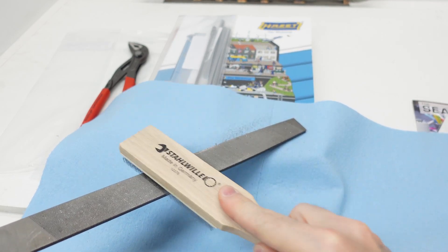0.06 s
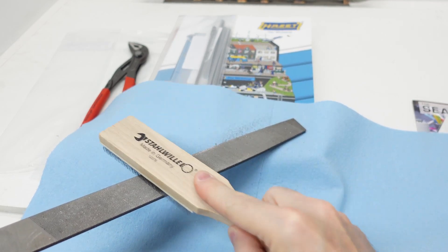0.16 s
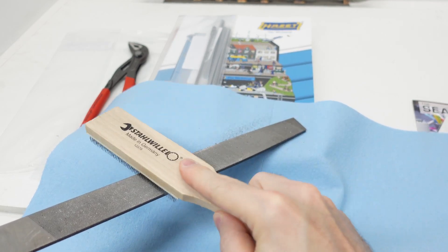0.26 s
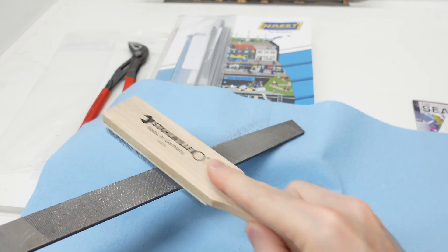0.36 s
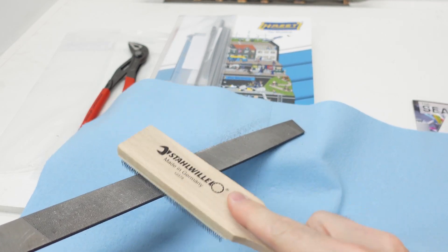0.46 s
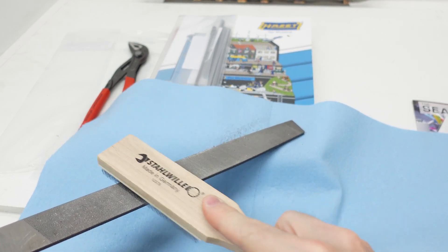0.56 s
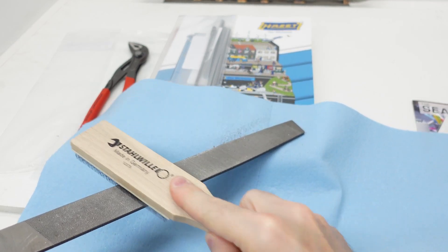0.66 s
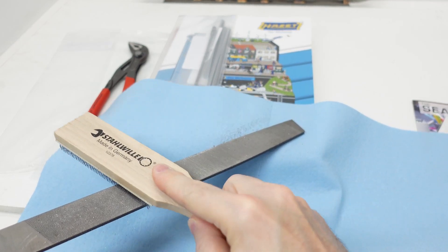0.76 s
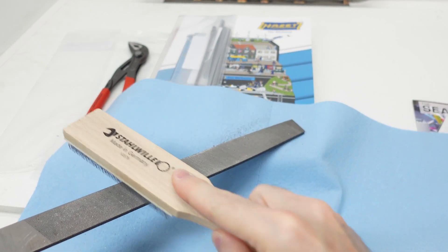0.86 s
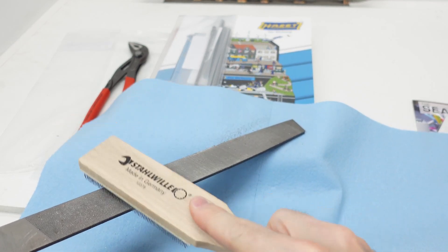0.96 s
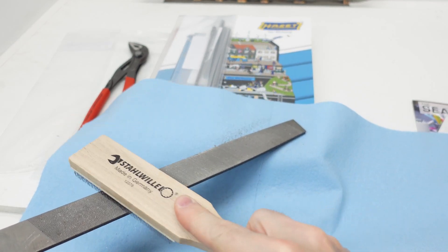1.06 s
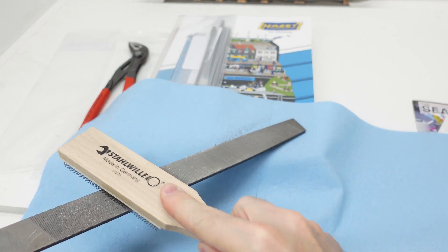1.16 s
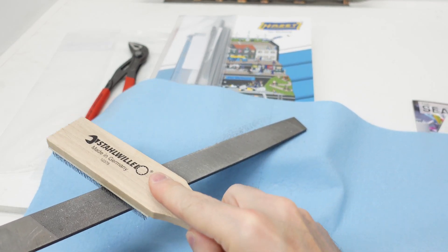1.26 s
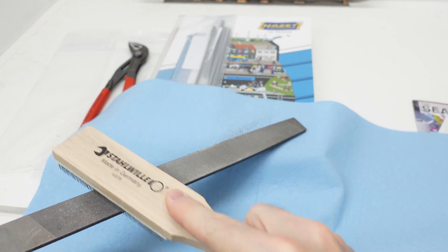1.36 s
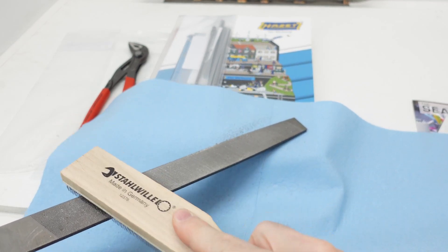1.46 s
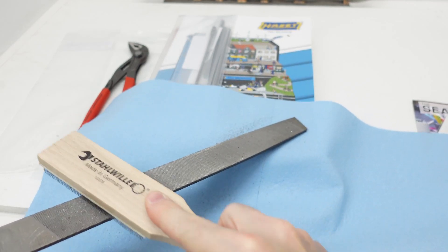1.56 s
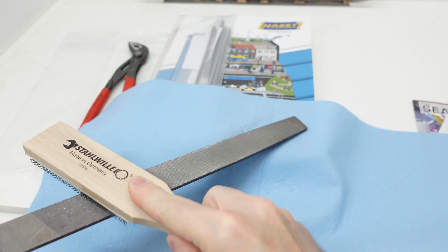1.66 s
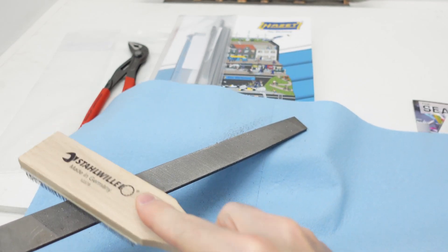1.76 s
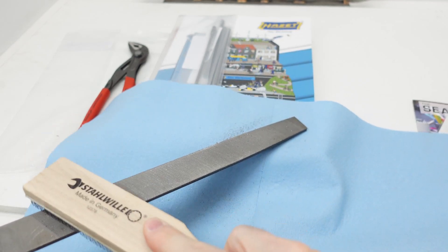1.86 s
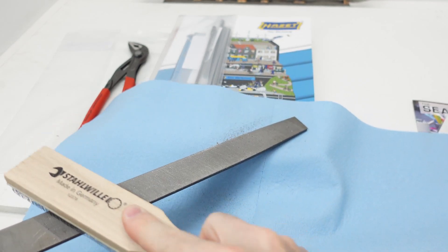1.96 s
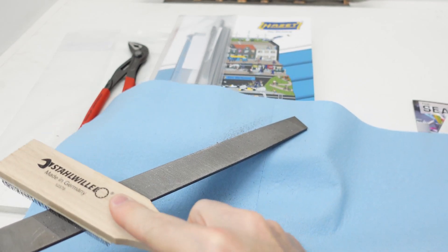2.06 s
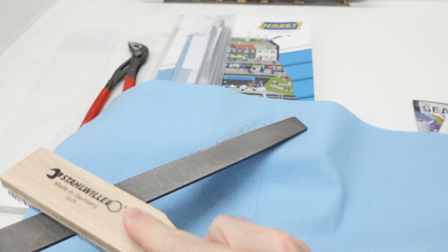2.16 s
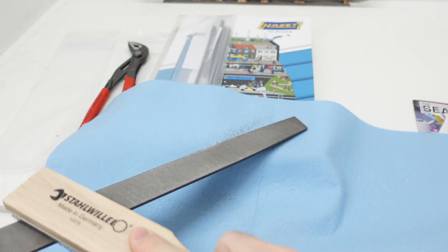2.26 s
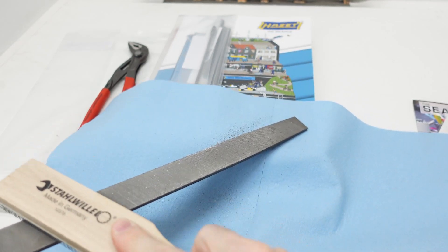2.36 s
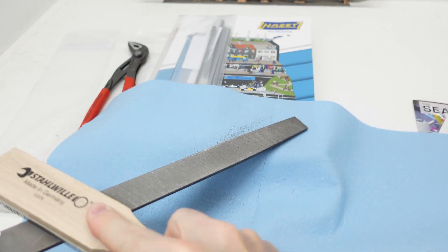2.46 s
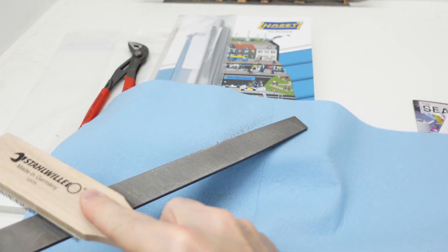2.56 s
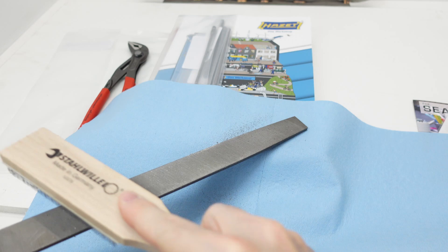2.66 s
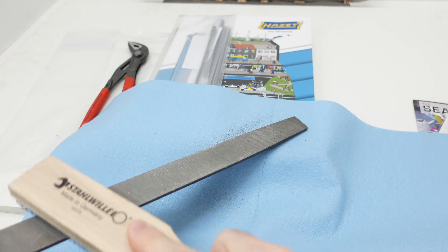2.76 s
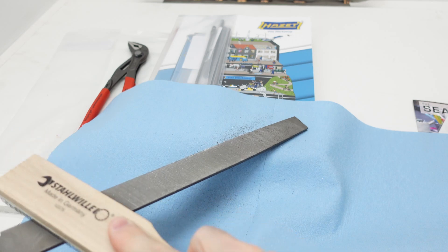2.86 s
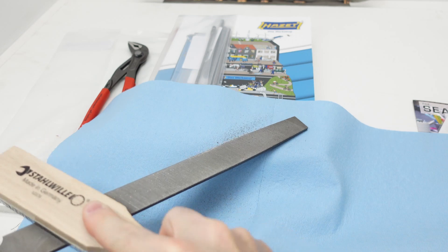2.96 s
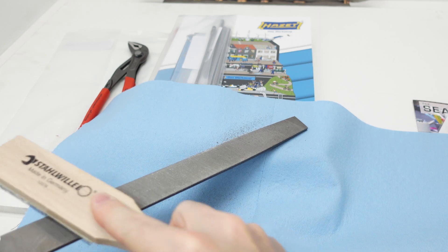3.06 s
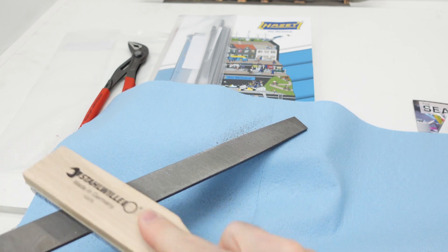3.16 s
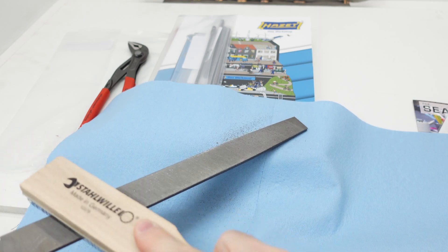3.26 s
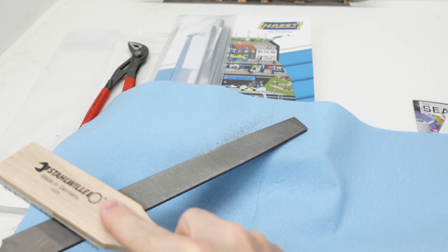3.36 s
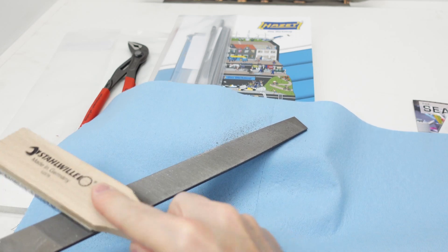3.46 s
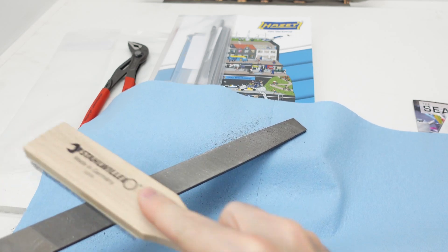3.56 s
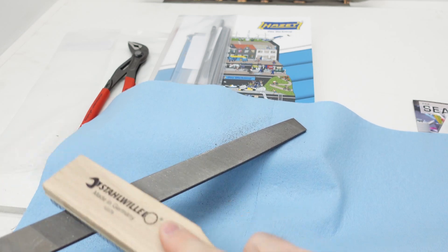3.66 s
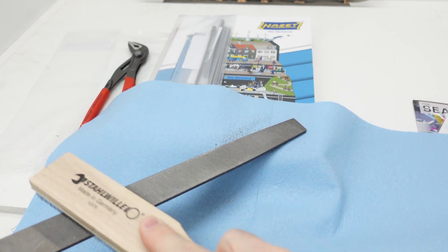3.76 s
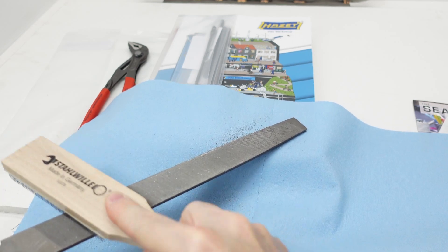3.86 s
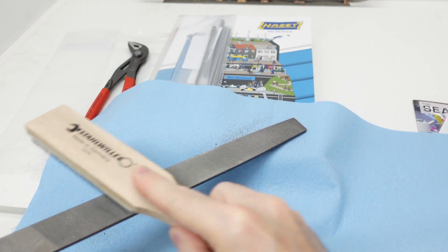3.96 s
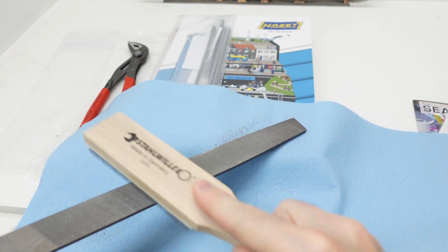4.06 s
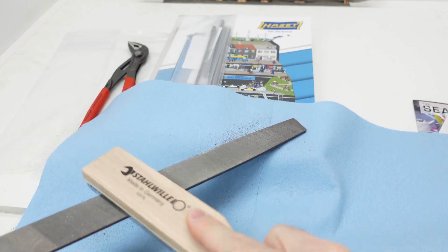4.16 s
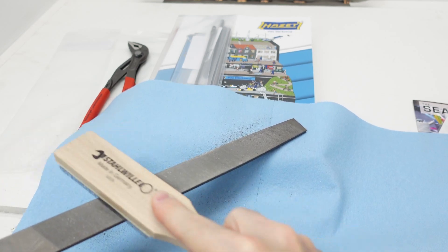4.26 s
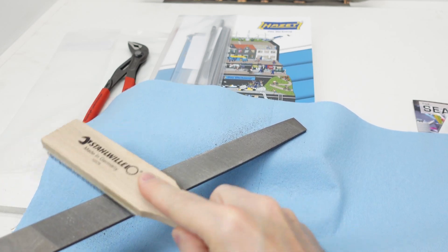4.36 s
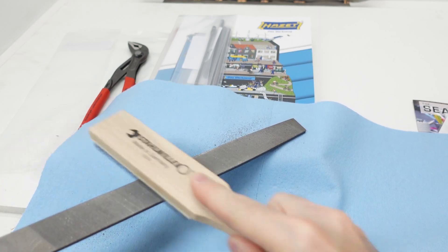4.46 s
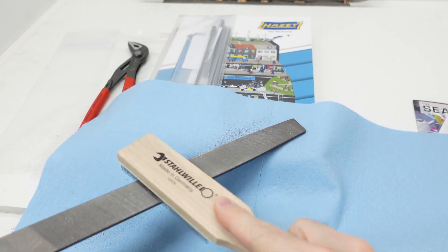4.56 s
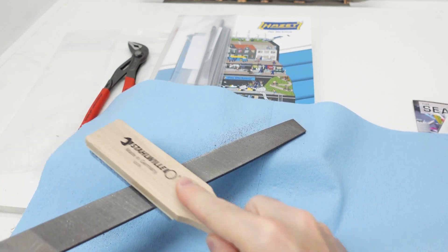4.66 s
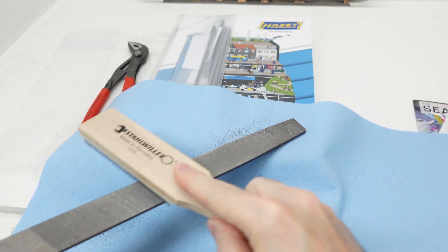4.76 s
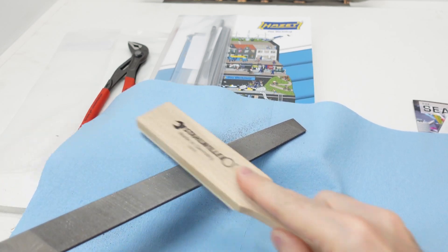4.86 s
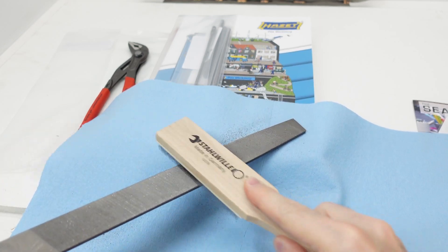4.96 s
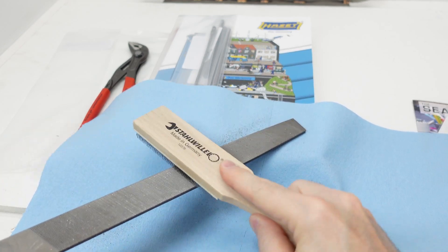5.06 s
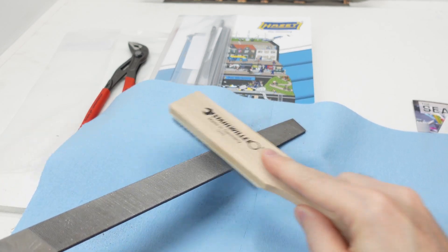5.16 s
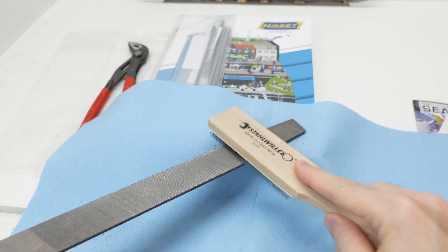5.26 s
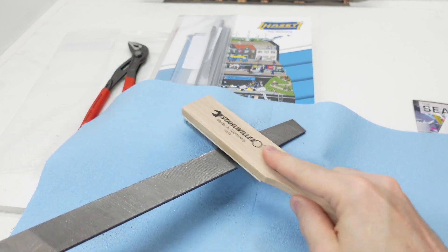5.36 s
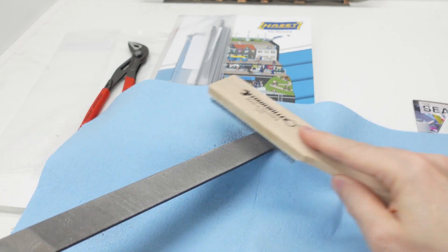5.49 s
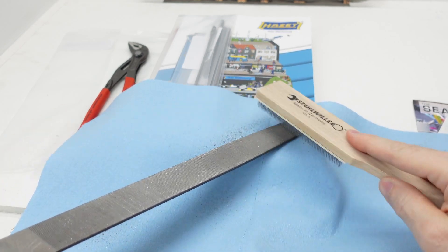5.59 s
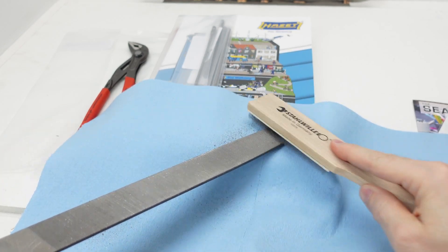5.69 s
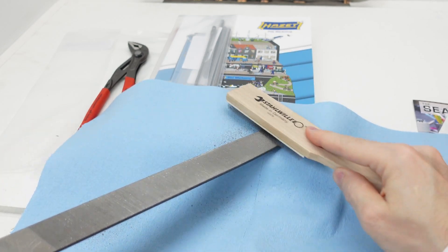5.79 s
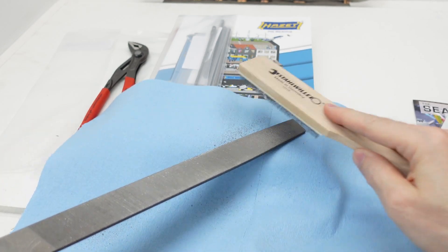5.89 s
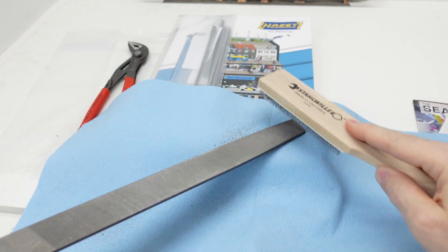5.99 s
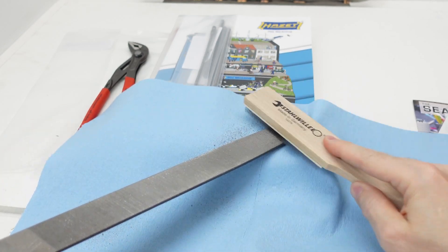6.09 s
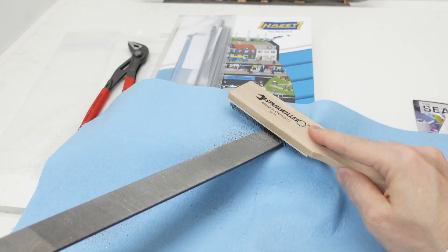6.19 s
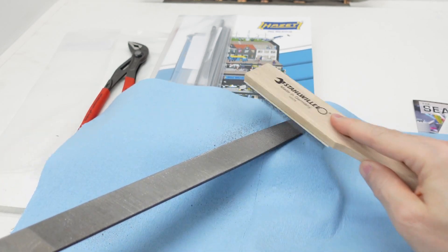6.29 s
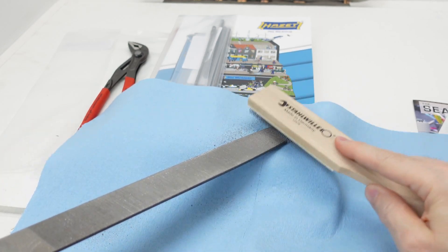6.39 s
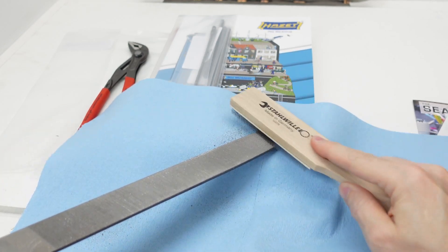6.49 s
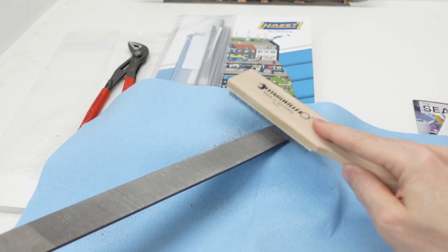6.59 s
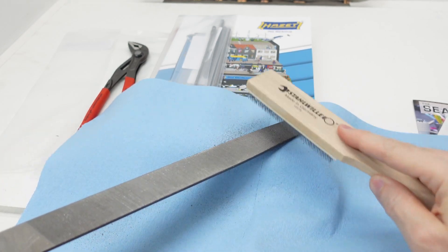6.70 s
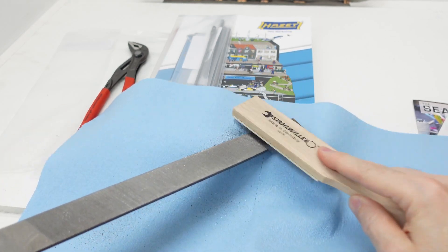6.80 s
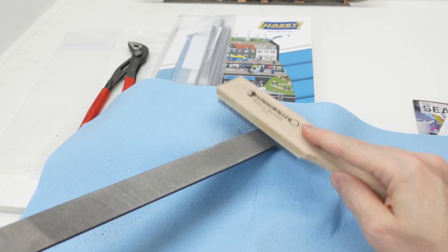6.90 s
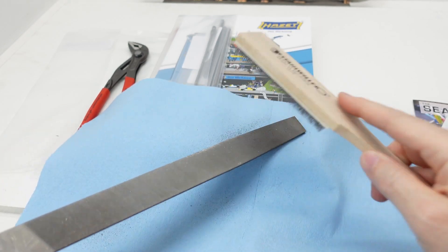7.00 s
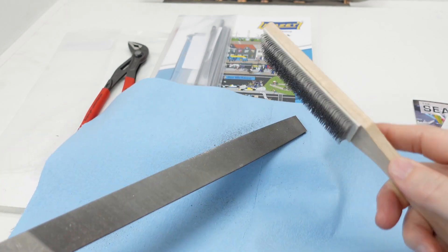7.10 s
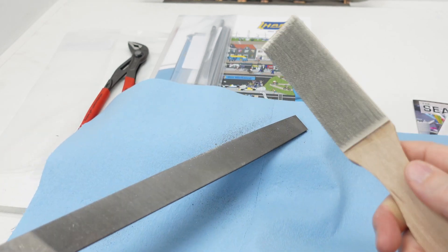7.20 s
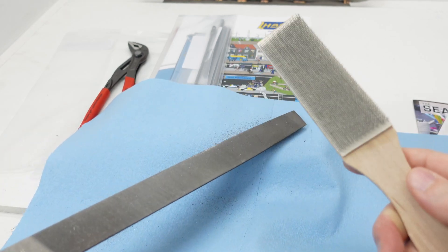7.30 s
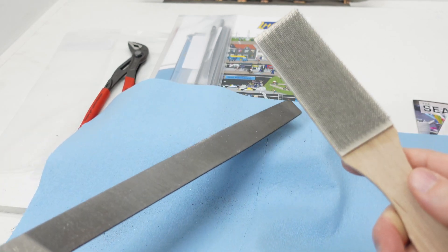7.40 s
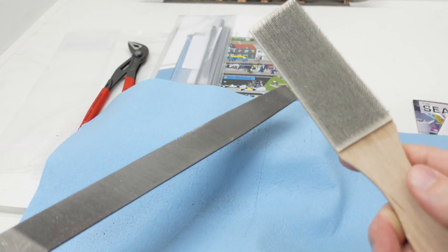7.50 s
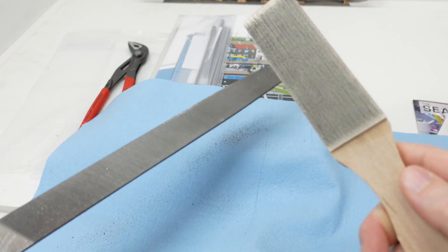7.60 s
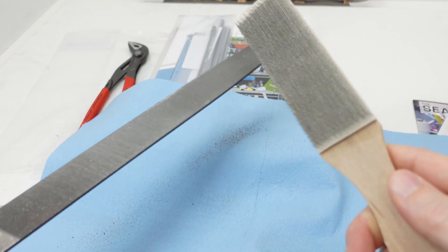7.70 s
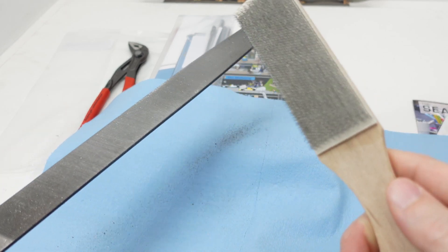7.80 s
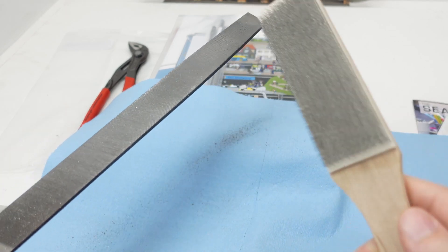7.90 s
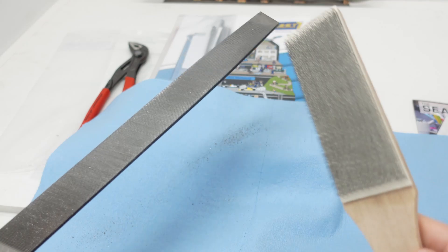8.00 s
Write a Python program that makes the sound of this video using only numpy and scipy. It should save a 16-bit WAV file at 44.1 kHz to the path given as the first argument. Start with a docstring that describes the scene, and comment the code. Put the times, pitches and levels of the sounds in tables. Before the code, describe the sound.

A steel-wire brush scrubs a metal file in short, dry, scratchy strokes, each landing with a light knock, growing lighter before stopping.

```python
"""A wooden-backed steel-wire brush cleans a flat file resting on a cloth, close by, in a quiet workshop.
Over low air noise and hum, each of seventeen strokes lands with a knock, scrapes as hundreds of wire
tips catch on the teeth, and flicks off the edge; now and then a tuft snags and snaps free.
The brush works from the middle of the file to its heel, then out to the tip in shorter strokes.
Last, it is lifted away and fingers rustle faintly on the tools."""
import sys
import numpy as np
from scipy import signal
from scipy.fft import rfft, irfft, next_fast_len
from scipy.io import wavfile
from scipy.ndimage import uniform_filter1d, map_coordinates

SR = 44100
rng = np.random.default_rng(int(sys.argv[2]) if len(sys.argv) > 2 else 0)


def generate_wav(sig):
    """Save sig (samples, or channels by samples) to the path in sys.argv[1] as 16-bit PCM at SR."""
    pcm = np.round(np.clip(np.atleast_2d(sig).T, -1, 1) * 32767).astype(np.int16)
    wavfile.write(sys.argv[1], SR, pcm)


N = 354563

# brush strokes: start_s, end_s, level_db, crest_fraction, swell_db, fade_db, dull_db, zing_db, ring_db
STROKES = [(0.033, 0.335, -37, .74, 15.5, 19.5, 0.3, -2.5, 1.5),
           (0.58, 0.819, -35, .78, 8, 21.5, -.5, 2.5, -7),
           (1.042, 1.313, -37.5, .8, 9.5, 23.5, 0.8, -1.5, -6),
           (1.507, 1.728, -33.5, .63, 12, 20.5, 0.44, 3.5, -2),
           (1.918, 2.123, -33.5, .61, 26, 25, 0, 5.5, -16),
           (2.333, 2.593, -33.3, .74, 18.5, 14, 0.3, 7, -14),
           (2.841, 3.085, -33, .67, 10.5, 20, 0.1, 9.5, -12),
           (3.288, 3.499, -31.5, .66, 14.5, 11.5, -0.14, 9.5, -12),
           (3.753, 3.952, -31.5, .63, 19.5, 9, 0, 4.5, -3),
           (4.221, 4.417, -33.5, .7, 9.5, 11, -0.55, 5, -2),
           (4.61, 4.803, -34.5, .63, 15.5, 17.5, -0.1, 1.5, -0.5),
           (4.992, 5.141, -38, .23, 11, 9.5, 0.5, 9, 4.5),
           (5.34, 5.471, -40.5, .44, 1.5, 14.5, 2.5, 17, -16.5),
           (5.731, 5.874, -40.5, .55, 4.5, 11.5, 4, 0, 0), (6.134, 6.27, -39.5, .29, 2.5, 20, 6.5, 7, -11),
           (6.486, 6.612, -40, .3, 8.5, 19, 5, 3, -7), (6.842, 6.938, -43, .46, 3, 11.5, 3, 0, -16)]
# spectrum of wire on steel: freq_hz, gain_db
WIRE_SPECTRUM = [(40, -31.5), (100, -12.5), (300, -9.5), (600, -6.5), (1000, -3), (1800, -2), (3000, -5.5),
                 (5500, 0.5), (10000, -0.5), (12500, -7), (14000, -13.5), (16000, -21.5)]
# file and brush resonances, contact at mid-file: centre_hz, width_hz, lift_db
MIDDLE_RESONANCES = [(332, 110, 6.2), (785, 200, 4.2), (1147, 170, 5.3), (2390, 600, 7.2), (3157, 720, 7.1),
                     (3960, 300, 2.2), (4870, 1500, 7), (6190, 560, 3.0), (7370, 170, 3.9),
                     (8600, 440, 4.2), (9240, 400, 5.9), (11450, 1700, 6.2), (13260, 1400, 4)]


def amp(db):
    """Decibels to gain."""
    return 10 ** (np.asarray(db) / 20)


def unit(x):
    """Scale to rms 1."""
    return x / np.sqrt(np.mean(x ** 2) + 1e-20)


def along(points, hz):
    """Interpolate (freq_hz, value) points on a log axis."""
    freq_hz, values = np.transpose(points)
    return np.interp(np.log(hz + 1), np.log(freq_hz + 1), values)


def lifts(resonances, hz):
    """Summed dB gain of bell-shaped resonances."""
    return sum(db / (1 + (2 * (hz - centre) / width) ** 2) for centre, width, db in resonances)


def wire_db(resonances, hz):
    """Wire-on-steel spectrum plus resonances."""
    return along(WIRE_SPECTRUM, hz) + lifts(resonances, hz)


def coloured(x, gain_db):
    """Minimum-phase filter to gain_db(hz): resonances ring after each pulse."""
    size = 2 * next_fast_len(len(x) // 2 + 4096)
    cepstrum = irfft(np.log(amp(gain_db(np.fft.rfftfreq(size, 1 / SR))) + 1e-6))
    cepstrum[1:size // 2] *= 2
    cepstrum[size // 2 + 1:] = 0
    return irfft(rfft(x, size) * np.exp(rfft(cepstrum)))[:len(x)]


def band(x, low_hz, high_hz):
    """Brick-wall band-pass."""
    size = next_fast_len(len(x) + 4096, True)
    hz = np.fft.rfftfreq(size, 1 / SR)
    return irfft(rfft(x, size) * ((hz >= low_hz) & (hz < high_hz)), size)[:len(x)]


def add(track, start_s, sound):
    """Mix a sound into the track."""
    start = round(start_s * SR)
    track[start:start + len(sound)] += sound[:max(N - start, 0)]


def progress():
    """Fraction of the stroke done, per sample."""
    spans_s = [row[:2] for row in STROKES]
    return np.interp(np.arange(N) / SR, np.ravel(spans_s), np.tile([0, 1], len(spans_s)))


def held(values):
    """Hold one value through each stroke, per sample."""
    return np.interp(np.arange(N) / SR, np.ravel([row[:2] for row in STROKES]), np.repeat(values, 2))


def contact_shares():
    """Shares of heel, middle and tip in the contact, per sample."""
    # brush path: time_s, place (0 heel, 1 middle, 2 tip)
    path = [(0, 0.98), (1.4, 1.05), (1.85, 0.18), (2.3, 0.1), (3.5, 0.16), (3.85, 0.43), (4.3, 0.75),
            (4.7, 1), (5.1, 1.22), (5.35, 1.78), (5.7, 1.785)]
    place = np.interp(np.arange(N) / SR, *np.transpose(path))
    return np.clip(1 - abs(place - np.arange(3)[:, None]), 0, 1)


def bending(fold_fraction=0.38, steepness=4.5, tip_ease=0.69):
    """Wires fold mid-stroke: -1/2 upright, +1/2 bent; less in the light strokes at the tip."""
    fold = .5 * np.tanh(steepness * (progress() - fold_fraction))
    return fold * (1 - tip_ease * contact_shares()[-1])


def room_tone(air_rms_db=-59.5):
    """Low steady air noise with a faint hum."""
    # air noise spectrum: freq_hz, gain_db
    air_spectrum = [(15, -71), (25, -22), (108, -7), (141, -7.5), (161, -7), (249, -6.5), (293, -1),
                    (384, -8.5), (754, -16.5), (818, -13), (1700, -22.5), (1890, -22), (2410, -26.5),
                    (3250, -29), (16000, -48.5)]
    # hum tones: pitch_hz, rms_db
    hum_tones = [(118.4, -70.5), (166.9, -69.5), (301.5, -75.5)]
    t = np.arange(N) / SR
    hum = sum(amp(db) * np.sqrt(2) * np.sin(2 * np.pi * (hz * t + rng.random())) for hz, db in hum_tones)
    air = coloured(rng.standard_normal(N), lambda hz: along(air_spectrum, hz))
    return hum + amp(air_rms_db) * unit(air)


def struck(modes, t, attack_s=0.001):
    """Decaying sines of struck modes."""
    ring = sum(amp(db - 60 * t / t60_s) * np.sin(2 * np.pi * hz * t) for hz, db, t60_s in modes)
    return ring * (1 - np.exp(-t / attack_s))


def knocks(flex_t60_s=0.049, tick_db=-21, tick_t60_s=0.022, rebound_s=0.00386, low_cut_hz=90):
    """Landings: a push and a rebound; the file flexes and bounces, the wood clacks, the wires tick."""
    # brush landings: start_s, push_db, push_hz, flex_db, flex_hz, clack_db
    landings = [(0.0272, -18.5, 480, -26.5, 375, -21), (0.5752, -16, 487, -25, 373, -17),
                (1.0391, -18, 1170, -23.5, 386, -25), (1.4856, -17.5, 490, -25, 374, -27.5),
                (1.912, -14, 1080, -30.5, 338, -25), (2.329, -18.5, 880, -29, 339, -33.5),
                (2.8422, -17, 1234, -31, 320, -18), (3.2645, -25, 1158, -28, 380, -26.5),
                (3.7465, -17, 538, -32, 320, -26), (4.2198, -16, 1155, -23, 381, -25),
                (4.6084, -16, 536, -22, 375, -20), (4.987, -17.5, 1030, -23, 280, -13.5),
                (5.33, -16.5, 700, -22, 495, -16.5), (5.7297, -44, 1530, -22, 358, -23),
                (6.1287, -18.5, 420, -18, 323, -4), (6.486, -26.5, 437, -18, 376.3, -14.5),
                (6.842, -27.5, 696, -27, 318, -40)]
    # modes of the wooden back: pitch_hz, gain_db, t60_s
    wood_modes = [(530, -11.5, 0.021), (953, -19, 0.054), (1196, 0.5, 0.014), (1530, -6, 0.013),
                  (2500, -7, 0.007), (3110, -10, 0.0095)]
    # file bouncing on its support: pitch_hz, gain_db, t60_s
    bounce_modes = [(153.8, -10, 0.14), (241, 8, 0.024)]
    # bounce re push: heel_db, middle_db, tip_db
    bounce_db = [-17.5, -10, -13]
    rebound_db = [-11, -21.5, -5]  # re landing: heel, middle, tip
    out, t = np.zeros(N), np.arange(SR // 6) / SR
    shares = contact_shares()
    for start_s, push_db, push_hz, flex_db, flex_hz, clack_db in landings:
        share, cycles = shares[:, round(start_s * SR)], t * push_hz
        push = -10 * cycles * np.exp(-4 * cycles) * np.sin(2 * np.pi * cycles)
        burst = rng.standard_normal(len(t)) * amp(tick_db - 60 * t / tick_t60_s)
        tick = amp(push_db) * coloured(burst, lambda hz: wire_db(MIDDLE_RESONANCES, hz))
        blow = amp(push_db) * push + amp(clack_db) * struck(wood_modes, t)
        bounce = amp(push_db + np.dot(bounce_db, share)) * struck(bounce_modes, t)
        flex = struck([(flex_hz, flex_db, flex_t60_s)], t)
        add(out, start_s, blow + bounce + flex + tick)
        add(out, start_s + rebound_s, amp(np.dot(rebound_db, share)) * blow)
    # low cut keeps deep bass out of the knocks
    return signal.lfilter(*signal.butter(2, low_cut_hz, "high", fs=SR), out)


def hand_pressure(touch_s=0.0032, leave_s=0.0015, tremor_db=0.85, tremor_per_s=45):
    """Gains of rasp, scrape and hiss: each stroke swells fast, crests and fades; zero off the file."""
    t, bend, gains = np.arange(N) / SR, bending(), np.zeros((3, N))
    tremor_knots = rng.standard_normal(N // 100)
    for start_s, end_s, level_db, crest_fraction, swell_db, fade_db, dull_db, *_ in STROKES:
        on = (t > start_s - touch_s) & (t < end_s + leave_s)
        touching = np.interp(t[on], [start_s - touch_s, start_s, end_s, end_s + leave_s], [0, 1, 1, 0])
        crest_s = start_s + crest_fraction * (end_s - start_s)
        before = np.interp(t[on], [start_s, crest_s], [1, 0])
        after = np.interp(t[on], [crest_s, end_s], [0, 1])
        tremor = map_coordinates(tremor_knots, [t[on] * tremor_per_s])
        scrape_db = level_db - swell_db * before ** 4.66 - fade_db * after ** 2.2 + tremor_db * tremor
        rasp_db = scrape_db - 10 - 4 * bend[on] + 1.28 * dull_db
        hiss_db = scrape_db - 0.93 - 5.5 * bend[on] - dull_db
        gains[:, on] = touching * amp([rasp_db, scrape_db, hiss_db])
    return gains


def catches(resonances, dull_db, rate_per_s, spread_db=3.5, rub_gain=0.39):
    """Tips slip off teeth: uneven random pulses over a smooth rub, through file and brush resonances."""
    chance = np.clip(rate_per_s / SR, .01, 1)
    slips = (rng.random(N) < chance) / np.sqrt(chance)
    sizes = rng.choice([-1, 1], N) * amp(spread_db * rng.standard_normal(N))
    friction = unit(slips * sizes) + rub_gain * rng.standard_normal(N)
    dulling = [(4000, 0.017), (7500, -dull_db / 2), (12000, -dull_db)]  # freq_hz, gain_db
    return unit(coloured(friction, lambda hz: wire_db(resonances, hz) + along(dulling, hz)))


def flexing_wires(x, zing_top_hz=4565, zing_rise_hz=1336, waver_db=1.97, tip_waver_db=2.5):
    """Colour shifts as wires bend and tufts trade the load; wires slipping together zing upward."""
    # colour change, upright to bent: centre_hz, width_hz, change_db
    bend_colour = [(1500, 700, -3), (2450, 650, 5.5), (3170, 1400, 8), (4170, 560, 12.5), (4950, 990, -3.5),
                   (6300, 1000, 7), (7500, 520, 4), (8990, 2000, -6.5), (10600, 1500, 6.5)]
    hz, frame_s, spectrum = signal.stft(x, SR, nperseg=512)
    controls = (*contact_shares(), bending(), progress(), held([db for *_, db, _ in STROKES]))
    _, middle, tip, bend, done, zing_db = [np.interp(frame_s * SR, np.arange(N), c) for c in controls]
    zing_hz = zing_top_hz - zing_rise_hz * (1 - done) * (1 - tip)
    resonances = [(centre_hz, width_hz, db * bend) for centre_hz, width_hz, db in bend_colour]
    resonances.append((zing_hz, 630, zing_db * (bend + .5)))
    resonances.append((9190, 800, 3 * middle * (.5 - bend)))  # sheen of upright wires at mid-file
    patches = uniform_filter1d(rng.standard_normal(spectrum.shape), size=4, axis=0)
    patches = unit(uniform_filter1d(patches, size=9, axis=1))
    # few wires touch at the tip, so single tufts stand out
    tufts_db = (waver_db + tip_waver_db * tip) * patches
    return signal.istft(spectrum * amp(lifts(resonances, hz[:, None]) + tufts_db), nperseg=512)[1][:N]


def scrape(light_per_s=2200, hard_per_s=13000):
    """Skating tips hiss, wires pressed into the teeth rasp; pressure merges the crackle of catches."""
    # file and brush resonances, contact at the heel: centre_hz, width_hz, lift_db
    heel_resonances = [(1310.0, 1300, 12), (1750, 99, -4.5), (2167, 220, 11), (3040, 1140.0, 15),
                       (4220, 1400, 4.5), (4980.0, 580.0, 5), (5400, 240, -5.5), (5800, 150.0, 4),
                       (6220, 600, 8.5), (6920, 1300, 8.5), (7600, 400, -4.5), (8040, 260.0, 5),
                       (8720, 1300, 10), (9930, 1000, 9.5), (11400.0, 1100, 4), (13220.0, 1500.0, 6.5)]
    # contact at the tip: centre_hz, width_hz, lift_db
    tip_resonances = [(140, 100, 17.5), (372, 140, 17.5), (816, 200, -4), (1200, 1600, 9.5),
                      (1800, 220, -15.5), (2086, 480, 13.5), (3170, 660, 12.5), (4170, 250, 9.5),
                      (4740, 880, 6.5), (5760, 450, -9), (6380.0, 380.0, 7.5), (7250.0, 590, 6),
                      (8360.0, 1700, 8), (9180, 420.0, 10.5), (10030, 870, 4), (11680.0, 730.0, 0),
                      (13620.0, 2000, 4)]
    gains = hand_pressure()
    rate_per_s = light_per_s + (hard_per_s - light_per_s) * gains[1] / gains[1].max()
    places = [catches(heel_resonances, dull_db=2.5, rate_per_s=rate_per_s),
              catches(MIDDLE_RESONANCES, dull_db=3.0, rate_per_s=rate_per_s),
              catches(tip_resonances, dull_db=8.5, rate_per_s=rate_per_s)]
    steel = flexing_wires(np.sum(np.sqrt(contact_shares()) * places, axis=0))
    out = np.zeros(N)
    # rasp, scrape and hiss bands: the hand alone sets their levels
    for gain, edges_hz in zip(gains, [(0, 1900), (1900, 7000), (7000, SR)]):
        register = band(steel, *edges_hz)
        running_rms = np.sqrt(abs(uniform_filter1d(register ** 2, size=SR // 20)) + 1e-12)
        out += gain * register / running_rms
    return out


def steel_ring(wires, pitch_hz=2450, width_hz=55, bent_db=7, ping_db=-46, ping_t60_s=0.055, lead_s=.008):
    """The wires drive one narrow steel mode, more once bent; the last ones pluck it as they leave."""
    drive = wires * amp(held([ring_db for *_, ring_db in STROKES]) + bent_db * bending())
    out = signal.lfilter(*signal.iirpeak(pitch_hz, pitch_hz / width_hz, fs=SR), drive)
    t = np.arange(SR // 5) / SR
    for _, end_s, *_, ring_db in STROKES:
        ping = amp(ring_db + ping_db - 60 * t / ping_t60_s) * np.sin(2 * np.pi * pitch_hz * t)
        add(out, end_s - lead_s, ping)
    return out


def snaps():
    """A snagged tuft lets go in a short burst that rings the wires."""
    # tufts springing off a tooth or the edge: start_s, peak_db, t60_s
    releases = [(1.5095, -33, 0.039), (1.7361, -28, 0.011), (1.9318, -33, 0.024), (1.9372, -21, 0.017),
                (2.352, -29, 0.02), (2.3595, -27.5, 0.016), (3.0806, -31, 0.019), (3.27, -27, 0.021),
                (3.2932, -22.5, 0.025), (3.3001, -27.5, 0.022), (3.4944, -23, 0.022),
                (3.9543, -23.5, 0.011), (4.4071, -18, 0.018), (4.4124, -27, 0.015), (4.796, -31.5, 0.014),
                (5.1248, -20.5, 0.014)]
    # free ringing of short wires, bass cut: centre_hz, width_hz, lift_db
    twang = [(600, 2000, -13), (2426, 220, 11), (4480, 430, 13), (6730, 880, 12.5), (10610, 1100, 0),
             (12930, 3100, 12)]
    out, t = np.zeros(N), np.arange(SR // 12) / SR
    for start_s, peak_db, t60_s in releases:
        burst = rng.standard_normal(len(t)) * amp(-60 * t / t60_s)
        snap = coloured(burst, lambda hz: wire_db(twang, hz))
        add(out, start_s, amp(peak_db) * snap / np.max(abs(snap)))
    return out


def rustles(octave_off_db=-7):
    """Soft swells of noise as fingers shift on the tools."""
    # finger movements: start_s, level_db, length_s, centre_hz
    movements = [(6.97, -72, 0.47, 4000), (7.033, -57.5, 0.013, 2330), (7.166, -63, 0.018, 2000),
                 (7.2, -66, 0.081, 6000), (7.553, -71, 0.064, 3900), (7.84, -72, 0.0071, 7080)]
    out = np.zeros(N)
    for start_s, level_db, length_s, centre_hz in movements:
        swell = np.hanning(round(length_s * SR))
        noise = rng.standard_normal(len(swell))
        rub = coloured(noise, lambda hz: octave_off_db * np.log2((hz + 1) / centre_hz) ** 2)
        add(out, start_s, amp(level_db) * swell * unit(rub))
    return out


def reverb(x):
    """Short room tail; each frequency decays at its own rate."""
    # room decay: freq_hz, t60_s
    decay = [(150, 0.16), (1000, 0.15), (5000, 0.23), (9000, 0.22), (15000, 0.07)]
    hz, t, spectrum = signal.stft(rng.standard_normal(SR // 2), SR, nperseg=256)
    tail = signal.istft(spectrum * amp(-60 * t / along(decay, hz)[:, None]), SR, nperseg=256)[1]
    return signal.fftconvolve(x, tail / np.linalg.norm(tail))[:N]


def scene(reverb_db=-21.5):
    """Brush and file close by, the room far behind; mono."""
    wires = scrape() + snaps()
    tools = wires + steel_ring(wires) + knocks() + rustles()
    return (tools + amp(reverb_db) * reverb(tools) + room_tone())[None]


def record(dry):
    """Brick-wall low-pass."""
    return np.array([band(channel, low_hz=0, high_hz=16200) for channel in dry])


dry = scene()
out = record(dry)
generate_wav(out)
```